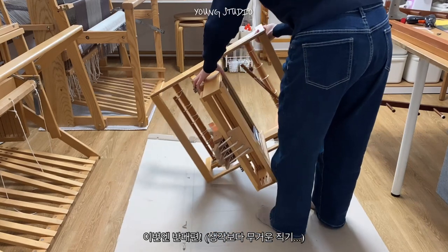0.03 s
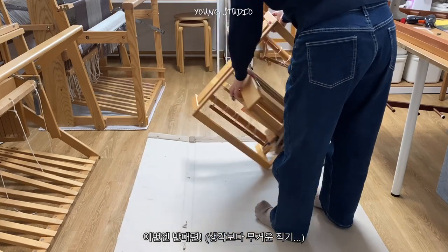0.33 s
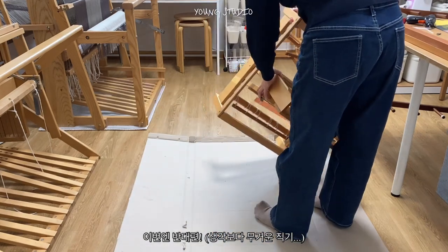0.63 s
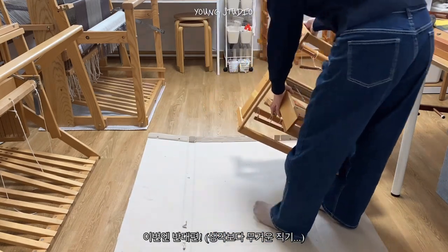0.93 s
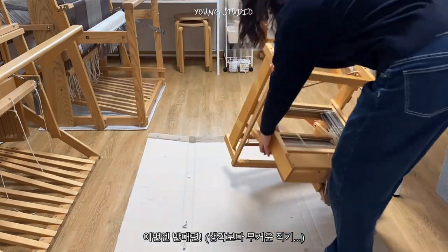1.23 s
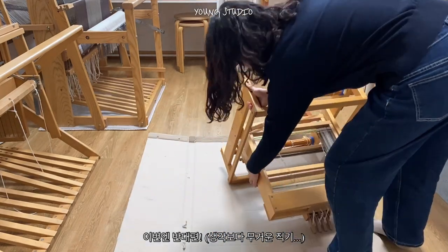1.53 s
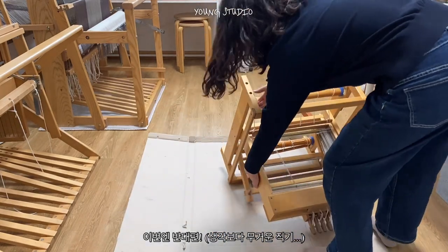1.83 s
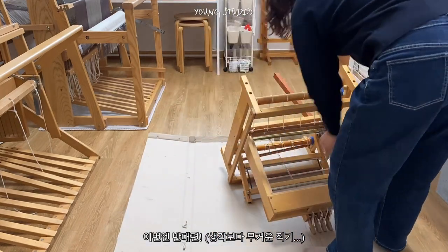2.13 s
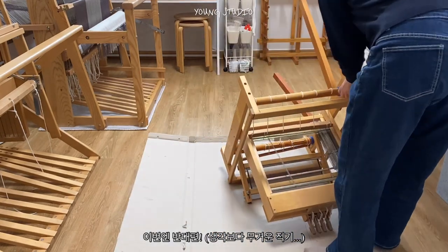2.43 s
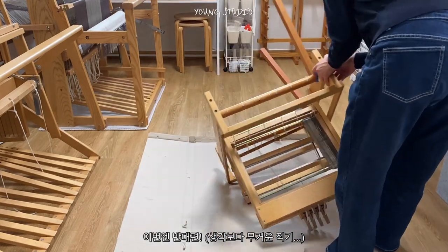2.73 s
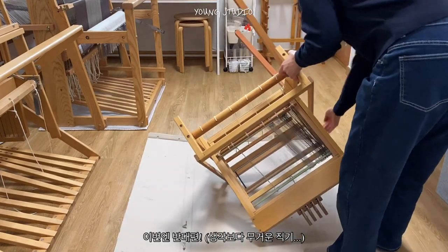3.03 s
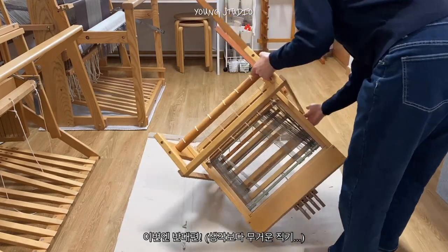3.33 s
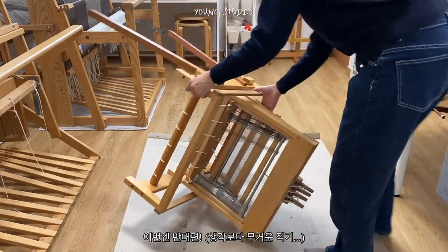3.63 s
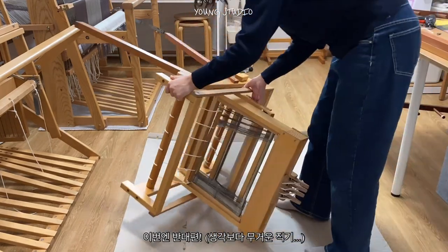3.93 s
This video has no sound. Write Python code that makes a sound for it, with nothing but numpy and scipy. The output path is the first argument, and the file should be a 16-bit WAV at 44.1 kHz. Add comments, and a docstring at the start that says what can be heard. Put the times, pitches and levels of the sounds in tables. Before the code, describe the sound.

Loose wooden bars knock and rattle close by as a loom is handled in a small room. It is set down with a thump, then tipped and scraped across a sheet, amid soft clothing scuffs and a faint rumble.

```python
"""A small wooden table loom clatters as it is turned over, set down on a sheet and tipped up again.
Its loose bars knock against the frame in quick flurries of contacts; beam, feet, slats and wires ring on.
The floor thumps from a footstep and from the loom being set down. Clothes and socks scuff and rustle,
then the loom slides over the sheet with a grainy rub. The small workshop rings briefly round two close
microphone ports, over the building's rumble and a faint drone."""
import sys
import numpy as np
from scipy import signal
from scipy.fft import rfft, irfft
from scipy.io import wavfile
from scipy.ndimage import uniform_filter1d

SR = 44100
rng = np.random.default_rng(int(sys.argv[2]) if len(sys.argv) > 2 else 0)


def generate_wav(sig):
    """Save sig (samples, or channels by samples) to the path in sys.argv[1] as 16-bit PCM at SR."""
    pcm = np.round(np.clip(np.atleast_2d(sig).T, -1, 1) * 32767).astype(np.int16)
    wavfile.write(sys.argv[1], SR, pcm)


N = 176400
T = np.arange(N) / SR
HZ = np.fft.rfftfreq(2 * N, 1 / SR)


def knocks(trim_db=-26, contacts_per_s=16000, room_db=-4.5):
    """Loose bars hit the frame: a flurry of contacts as joints close and settle, then the room's tail."""
    # Each row: peak time in seconds, level in dB, relative dB of the low, low-mid, mid, high and top
    # bands, build-up in seconds, settling in seconds.
    hits = [(0.023, -35.5, -17.5, -8.5, -2.5, -31.5, -53, 0.0071, 0.011),
            (1.067, -43.5, -18, -2.5, 9, -15, -13, 0.0022, 0.021),
            (1.098, -31, -30.5, -9, -12, -28.5, -40.5, 0.0024, 0.0044),
            (1.111, -30.5, -13.5, -4.5, -3.5, -14.5, -74, 0.011, 0.0051),
            (1.375, -33.5, -18, -4.5, -6, -12, -36, 0.0066, 0.007),
            (1.531, -40.5, -16, -1, 3, -13, -24.5, 0.0056, 0.012),
            (1.565, -33.5, -33, -18, -4.5, -22.5, -25, 0.0072, 0.005),
            (1.57, -32, -24.5, -22, -12.5, -11.5, -27.5, 0.0026, 0.0063),
            (1.768, -43, -26, -14.5, -2, -4, -34, 0.0026, 0.0085),
            (1.801, -45, -13, -9, 0, -12, -30, 0.0028, 0.011),
            (1.863, -16, -32, -22.5, -12.5, -14.5, -30.5, 0.0032, 0.0062),
            (2.35, -50, -23, -7, -10, -16, -24.5, 0.0029, 0.016),
            (2.604, -28.5, -38.5, -19, -7, -10, -28.5, 0.0027, 0.015),
            (2.712, -42.5, 1, 7.5, -1, -38, -27, 0.0071, 0.0027),
            (2.783, -33, -15.5, -2.5, -12, -28, -37, 0.0055, 0.0051),
            (3.162, -39, -26, -9.5, -3.5, -27, -28, 0.003, 0.012),
            (3.396, -30, -15.5, 0, -9, -15, -62, 0.0027, 0.0094),
            (3.405, -31, -25.5, -27, -5.5, -17, -42, 0.0064, 0.016),
            (3.806, -24, -19.5, -19, -2, -10, -27, 0.0036, 0.0099),
            (3.813, -19, -20, -9.5, -6, -5, -27, 0.0029, 0.0033)]
    # Centres and widths of those five bands, in Hz.
    bands_hz = [420, 1060, 2700, 6200, 12200]
    widths_hz = [450, 900, 2900, 4000, 3500]
    # The woody tone of every knock. Each row: frequency in Hz, gain in dB.
    wood = [(40, -30), (130, -12), (340, 2), (560, -0.5), (900, 1), (1400, -1), (2000, -1), (2900, -1.5),
            (3700, -2), (4500, 1.5), (5700, -5.5), (7600, 4), (11000, 6), (15500, 1)]
    out, t = np.zeros((2, N)), np.arange(-SR // 25, SR // 3) / SR
    for s, db, *bands_db, build_s, settle_s in hits:
        contacts = rng.standard_normal((2, len(t))) * (rng.random(len(t)) < contacts_per_s / SR)
        contacts *= swell(t, build_s, settle_s)
        in_room = unit_rms(contacts) + gain_of(room_db) * room_tail(t)
        colour = list(zip(bands_hz, np.array(bands_db) - 10 * np.log10(widths_hz)))
        knock = coloured(in_room, lambda hz: curve_at(colour, hz) + curve_at(wood, hz) + wood_ripple(hz))
        add(out, s + t[0], gain_of(db + trim_db) * unit_rms(knock))
    return out


def wood_ripple(hz, depth_db=2.5, spacing_hz=54.95):
    """Peaks and dips in dB of crowded wood resonances, different at each point of contact."""
    knots = np.arange(SR // 100) * spacing_hz
    return depth_db * np.interp(hz, knots, rng.standard_normal(len(knots)))


def ringing_parts():
    """Beam, foot, slat and wires each ring at their own pitches when struck."""
    # Modes. Each row: frequency in Hz, relative level in dB, seconds to fade by 60 dB.
    beam = [(596, -4, 0.13), (782, 4.5, 0.12), (946, 6, 0.16), (1204, -21, .11), (1460, -20, 0.15),
            (1594, 9.5, 0.07), (2240, -4, 0.033)]
    foot = [(348.8, -2.5, 0.17), (390, 0, 0.083), (467, -5, .1), (903, -14, 0.11), (1184, -14, 0.097),
            (1470, -5.5, 0.076)]
    slat = [(945, -12.5, 0.15), (1290, -17, .1), (1854, -12, 0.22), (2450, -6.5, 0.099),
            (2680, -9.5, 0.099), (3080, -2, .07), (3190, -0.5, 0.11), (3270, -1.5, .08), (3680, -5, 0.081)]
    wires = [(1580, -13, 0.19), (2030, -24, 0.11), (4120, -0.5, 0.062), (4883, 5, 0.047),
             (6080, 5.5, 0.042), (7200, -15, 0.06)]
    # Blows on each part. Each row: start in seconds, strength in dB.
    beam_blows = [(1.099, -54), (1.377, -68), (3.397, -61), (3.812, -46)]
    foot_blows = [(1.387, -51), (2.724, -52), (2.787, -41.5)]
    slat_blows = [(0.021, -62), (1.863, -41), (2.606, -39)]
    wire_blows = [(1.375, -50.5), (1.765, -65.5), (2.353, -81)]
    parts = [(beam, beam_blows), (foot, foot_blows), (slat, slat_blows), (wires, wire_blows)]
    return sum(ringing(modes, blows, rise_s=0.002) for modes, blows in parts)


def floor_thumps():
    """Low thumps on the floor from the loom being set down and a footstep."""
    # Floor modes. Each row: frequency in Hz, relative level in dB, seconds to fade by 60 dB.
    modes = [(36.2, -7, .3), (51, 0, 0.43), (94.4, 4, 0.13), (131, -3.5, 0.12), (172, -6.5, .14),
             (221.3, 0.5, 0.18), (347, -1.5, 0.056)]
    # Thumps. Each row: start in seconds, strength in dB.
    blows = [(0.01, -64), (1.371, -57.5), (1.868, -40.5), (1.937, -54), (3.806, -63)]
    return ringing(modes, blows, rise_s=0.0038)


def ringing(modes, blows, rise_s):
    """Each blow starts a body's modes as dying sines with random phases and a softened attack."""
    out, t = np.zeros((2, N)), np.arange(SR // 2) / SR
    attack = 1 - np.exp(-t / rise_s)
    for s, blow_db in blows:
        ring = sum(gain_of(db - 60 * t / t60) * np.sin(2 * np.pi * (hz * t + rng.random((2, 1))))
                   for hz, db, t60 in modes)
        add(out, s, gain_of(blow_db) * attack * ring)
    return out


def rustle_and_slide(trim_db=1.5):
    """Grainy rubbing and hiss: cloth rustles during handling, then the loom slides over the sheet."""
    # The moves. Each row: time in seconds, body level in dB, hiss level in dB.
    moves = [(0, -68.5, -69), (.15, -97, -93.5), (.22, -81, -78.5), (.34, -96, -90), (.5, -104, -93),
             (.64, -102, -106), (.81, -95, -96), (.93, -82, -108), (1.05, -86, -79), (1.16, -66, -76),
             (1.21, -71.5, -63.5), (1.34, -61, -68.5), (1.42, -76, -71.5), (1.50, -74, -65.5),
             (1.60, -76, -91), (1.72, -106, -97), (1.79, -65.5, -79), (1.85, -69.5, -83.5),
             (2.03, -93.5, -89), (2.2, -97.5, -109.5), (2.28, -85, -88), (2.42, -86, -88),
             (2.52, -75, -78.5), (2.60, -83, -113), (2.76, -82, -76), (2.88, -67, -65), (3.02, -65.5, -63),
             (3.12, -62.5, -60.5), (3.21, -58, -57.5), (3.275, -62.5, -61), (3.32, -75.5, -79),
             (3.385, -71.5, -71.5), (3.45, -69, -67), (3.53, -67.5, -61), (3.61, -64, -60.5),
             (3.72, -67.5, -59), (3.79, -62.5, -54.5), (3.88, -70, -71), (3.96, -67.5, -66), (4, -75, -78)]
    # Tone of the rub's midrange body and of its hiss. Each row: frequency in Hz, gain in dB.
    body_tone = [(100, -57), (400, -4.5), (750, -4.5), (1120, 3), (1600, -0.5), (2150, 5), (2720, 3),
                 (3200, -3.5), (3700, 1), (4450, 2), (5300, -3.5), (7000, -27.5), (12000, -11)]
    hiss_tone = [(2000, -21), (5000, 0.5), (6700, 4.5), (7900, 6.5), (9800, 1), (11700, 2.5), (13500, 0.5),
                 (15500, -5)]
    body = unit_rms(shaped(friction(N), gain_of(curve_at(body_tone, HZ) + wood_ripple(HZ))))
    hiss = unit_rms(shaped(friction(N), gain_of(curve_at(hiss_tone, HZ) + wood_ripple(HZ))))
    return gain_of(trim_db) * (body * fader(moves) + hiss * fader(moves, column=2))


def cloth_scuffs(trim_db=3, tail_db=-13, tail_s=0.041):
    """Short rubs of clothes and socks swell and fade, leaving a faint tail in the room."""
    # Each row: peak time in seconds, rise and fade in seconds, level in dB, treble tilt in dB per octave.
    scuffs = [(0.227, 0.0018, 0.0031, -64.5, 2.5), (.262, 0.0033, 0.0046, -66, 3.5),
              (.409, 0.0058, 0.03, -57.5, -1.5), (.436, .012, 0.021, -59.5, -1.5),
              (0.538, .006, 0.026, -65.5, 8), (.695, 0.0064, 0.0056, -83, 8),
              (0.721, 0.005, 0.0072, -81.5, 14), (0.856, 0.0073, 0.028, -60, 0.5),
              (.955, 0.0093, 0.046, -64.5, 4), (1.587, 0.0083, 0.017, -57.5, 1.5),
              (1.995, .004, .006, -76, 0), (2.364, .007, 0.0076, -65.5, 3), (2.54, 0.012, 0.022, -64.5, 12),
              (2.653, 0.0074, 0.0086, -50.5, 7.5), (3.227, 0.0057, 0.015, -56.5, 0),
              (3.549, 0.0031, 0.012, -56.5, 8.5), (3.578, 0.017, 0.021, -50, 3),
              (3.692, 0.012, 0.014, -57.5, 2)]
    # The tone of cloth. Each row: frequency in Hz, gain in dB.
    cloth = [(200, -19), (700, -3.5), (1800, -1.5), (3500, -3.5), (5500, -5), (7500, -4), (11000, -6),
             (15500, -14)]
    out, t = np.zeros((2, N)), np.arange(-SR // 12, SR // 4) / SR
    for s, rise_s, fade_s, db, tilt in scuffs:
        rub = coloured(friction(len(t)), lambda hz: curve_at(cloth, hz) + tilt * np.log2(1 + hz / 1000))
        tail = gain_of(tail_db) * np.exp(-abs(t) / tail_s) * (t > 0)
        envelope = np.hypot(swell(t, rise_s, fade_s), tail)
        add(out, s + t[0], gain_of(db + trim_db) * unit_rms(rub) * envelope)
    return out


def friction(size, catches_per_s=7000, catch_share=0.22, judder_db=0.96, judder_s=0.012):
    """Fine hiss with tiny catches of fibres, juddering in strength; two unrelated signals."""
    hiss, catches = rng.standard_normal((2, 2, size))
    catches = unit_rms(catches * (rng.random(size) < catches_per_s / SR))
    width = int(judder_s * SR)
    judder = unit_rms(uniform_filter1d(uniform_filter1d(rng.standard_normal(size), width), width))
    texture = np.sqrt(catch_share) * catches + np.sqrt(1 - catch_share) * hiss
    return texture * gain_of(judder_db * judder)


def room_tail(t, onset_s=0.0035):
    """The room's answer to a blow at t = 0: a dense tail, each band dying at its own speed."""
    # Reverb time. Each row: frequency in Hz, seconds to fade by 60 dB.
    t60 = [(60, 0.15), (250, 0.35), (900, .29), (2700, 0.22), (6000, 0.18), (14000, 0.13)]
    hz, frame_s, noise = signal.stft(rng.standard_normal((2, len(t))), SR, nperseg=256)
    fade_db = -60 * np.maximum(frame_s + t[0], 0) / curve_at(t60, hz)[:, None]
    tail = signal.istft(noise * gain_of(fade_db), SR, nperseg=256)[1][:, :len(t)]
    return unit_rms(tail * (1 - np.exp(-np.maximum(t, 0) / onset_s)))


def building_rumble(level_db=-68):
    """The building's steady rumble: a bed of bass-heavy noise."""
    # Each row: frequency in Hz, gain in dB.
    tone = [(15, -5), (30, -4), (48, -1.5), (63, 4.5), (80, -4.5), (105, -4.5), (150, -8.5), (220, -13.5),
            (300, -16), (420, -22.5), (900, -29), (2500, -49.5), (8000, -46), (16000, -47)]
    noise = diffuse(rng.standard_normal((2, N)))
    return gain_of(level_db) * unit_rms(shaped(noise, gain_of(curve_at(tone, HZ))))


def low_drone():
    """Two narrow bands of noise make a faint drone that swells and fades."""
    # Each row: centre in Hz, width in Hz, relative level in dB.
    bands = [(64.5, 7.4, -1.5), (283, 30, -14)]
    # The swell. Each row: time in seconds, level in dB.
    levels = [(0, -79), (.3, -69.5), (.6, -61.5), (.85, -63.5), (1.3, -59), (1.5, -79), (2.4, -82.5),
              (4, -73)]
    noise = diffuse(rng.standard_normal((2, N)))
    drone = sum(gain_of(db) * unit_rms(shaped(noise, 1 / (1 + (2 * (HZ - hz) / width) ** 2)))
                for hz, width, db in bands)
    return drone * fader(levels)


def diffuse(pair):
    """Makes two unrelated signals as alike as diffuse sound is at the two ports."""
    # Each row: frequency in Hz, left-right likeness (1 is mono).
    likeness = [(60, 1), (150, 0.96), (350, 0.74), (750, 0.41), (1300, 0.46), (2400, 0.76), (4200, 0.81),
                (5500, 0.59), (7500, 0.97), (9100, 1), (15000, 0.77)]
    alike = curve_at(likeness, HZ)
    mid = shaped(pair[0], np.sqrt((1 + alike) / 2))
    side = shaped(pair[1], np.sqrt((1 - alike) / 2))
    return np.array([mid + side, mid - side])


def gain_of(db):
    """Decibels to gain."""
    return 10 ** (np.asarray(db) / 20)


def unit_rms(x):
    """Scales to rms 1."""
    return x / np.sqrt(np.mean(x ** 2) + 1e-20)


def curve_at(points, hz):
    """Reads a curve on a log-frequency axis."""
    freqs, values = np.transpose(points)
    return np.interp(np.log(hz + 1), np.log(freqs + 1), values)


def fader(points, column=1):
    """Gain over time from a column of a dB curve."""
    rows = np.array(points)
    return gain_of(np.interp(T, rows[:, 0], rows[:, column]))


def swell(t, rise_s, fade_s):
    """Exponential rise and fade, peaking at t = 0."""
    return np.exp(-abs(t) / np.where(t < 0, rise_s, fade_s))


def add(mix, s, sound):
    """Adds a sound into the mix at s seconds."""
    at = round(s * SR)
    sound = sound[:, max(-at, 0):]
    part = mix[:, max(at, 0):][:, :sound.shape[1]]
    part += sound[:, :part.shape[1]]


def shaped(x, gain):
    """Filters by a gain given on HZ."""
    return irfft(rfft(x, 2 * N) * gain)[..., :N]


def coloured(x, db_at, size=8192):
    """Minimum-phase EQ for a short pair of signals, set by a function from Hz to dB."""
    log_gain = np.log(gain_of(db_at(abs(np.fft.fftfreq(size, 1 / SR)))))
    taps = np.fft.ifft(np.exp(np.conj(signal.hilbert(log_gain)))).real
    return signal.fftconvolve(x, taps[None, :size // 2], axes=1)[:, :x.shape[1]]


def scene():
    """The loom and its handling reach the two ports over the rumble and drone."""
    handling = ringing_parts() + floor_thumps() + knocks() + cloth_scuffs() + rustle_and_slide()
    return diffuse(handling) + building_rumble() + low_drone()


def record(dry, lag_from_hz=6950, lag_s=0.000234, cutoff_hz=15850):
    """The left port is slightly louder and lags in the treble; a low-pass trims the very top."""
    # Each row: frequency in Hz, half the left-right level difference in dB.
    balance = [(100, 0), (400, 0.7), (2500, 1), (5000, 1.43), (8000, -0.1), (15000, 0)]
    half_phase = np.pi * lag_s * np.maximum(HZ - lag_from_hz, 0)
    sides = np.array([[1], [-1]])
    ports = shaped(dry, gain_of(sides * curve_at(balance, HZ)) * np.exp(-1j * sides * half_phase))
    lowpass = signal.firwin(511, cutoff_hz, window=("kaiser", 9), fs=SR)
    return signal.oaconvolve(ports, lowpass[None], "same")


dry = scene()
out = record(dry)
generate_wav(out)
```